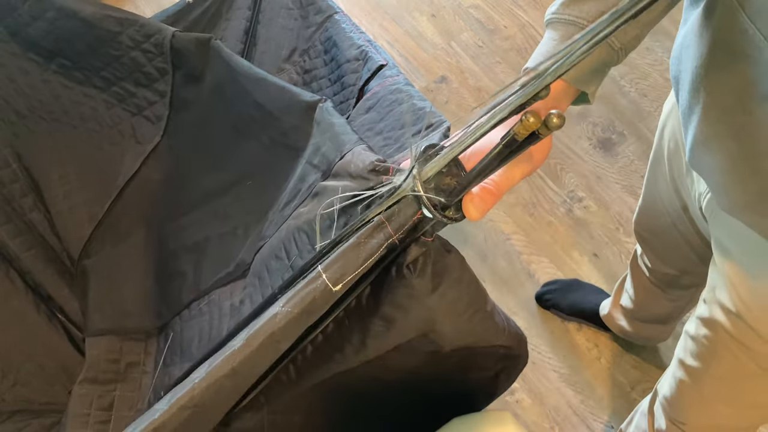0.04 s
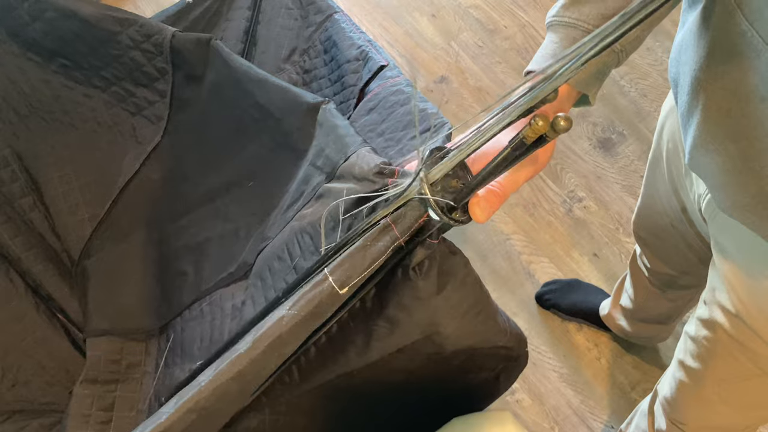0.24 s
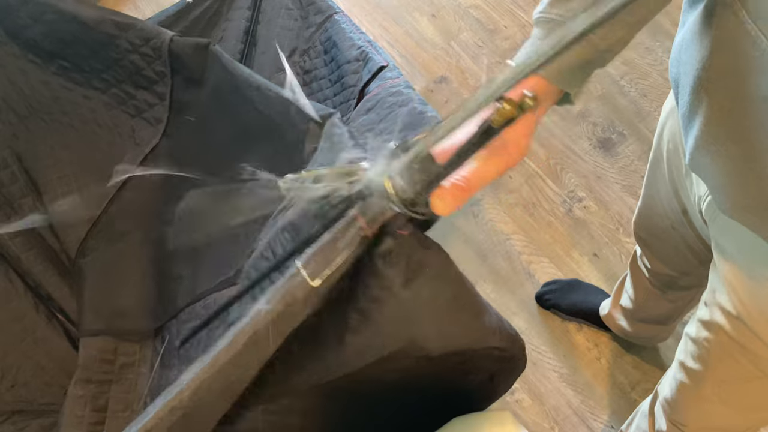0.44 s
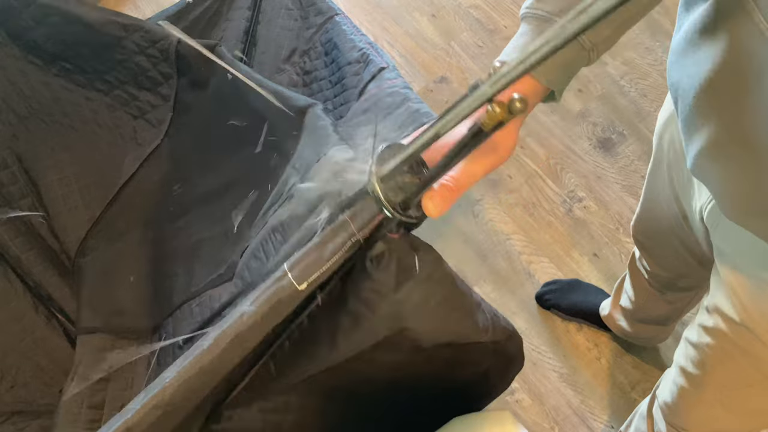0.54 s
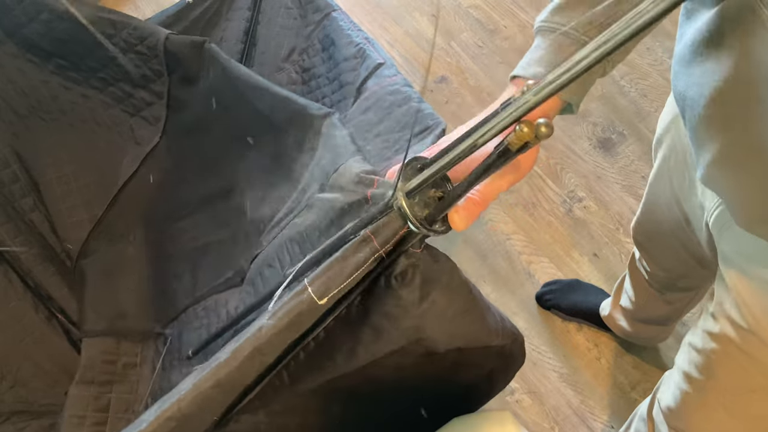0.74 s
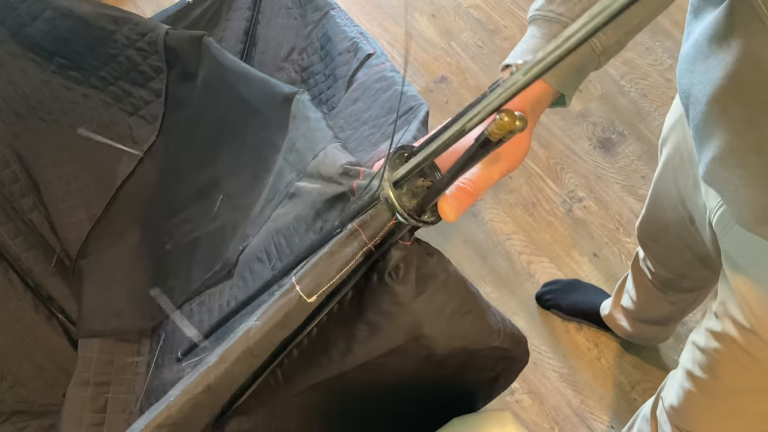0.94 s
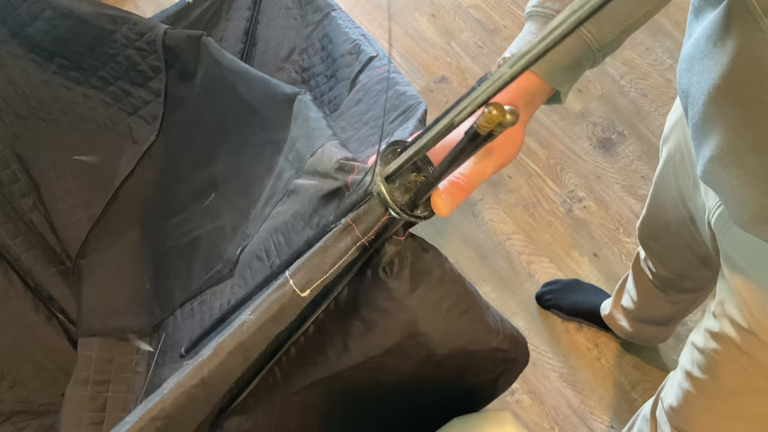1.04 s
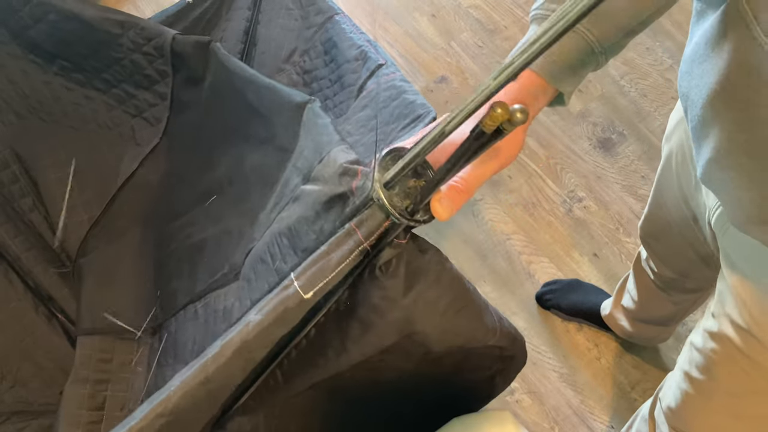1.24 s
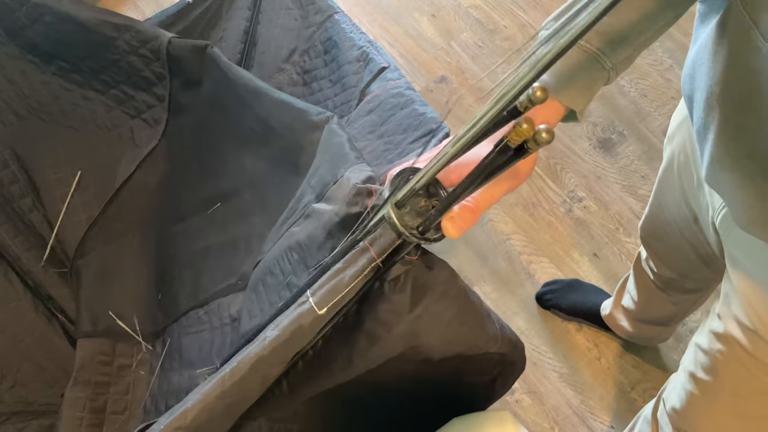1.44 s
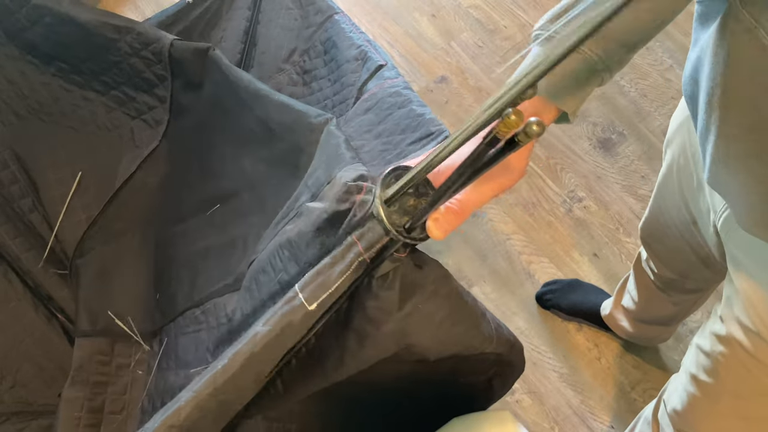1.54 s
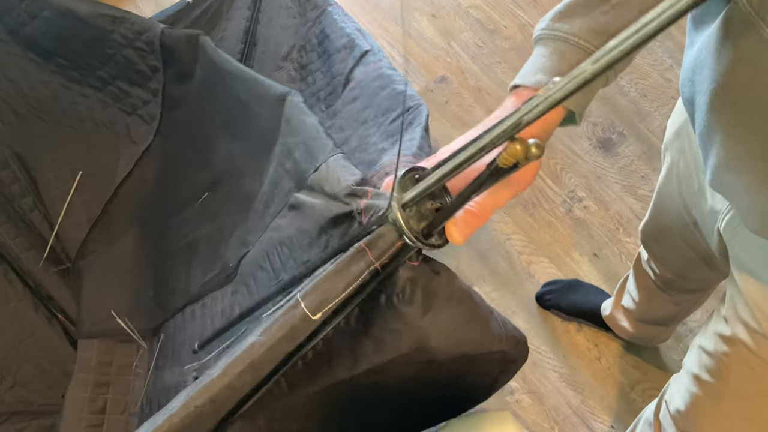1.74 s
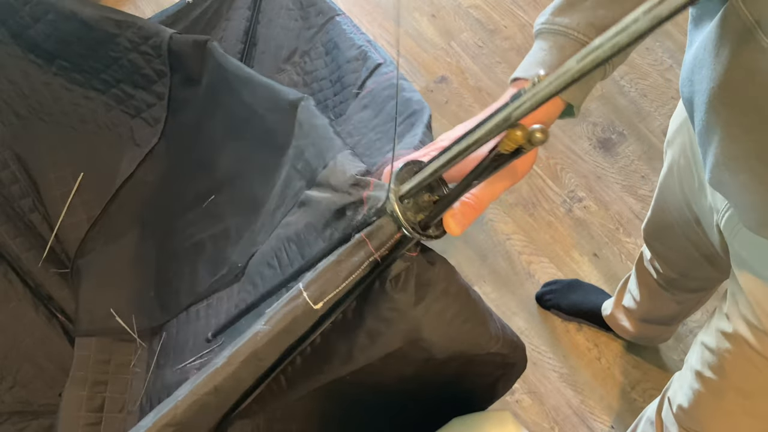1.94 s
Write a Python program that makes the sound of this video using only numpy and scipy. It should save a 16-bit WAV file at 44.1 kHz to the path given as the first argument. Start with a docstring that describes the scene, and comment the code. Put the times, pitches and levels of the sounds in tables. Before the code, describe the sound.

A splintered fiberglass rod is forced through a metal hub. After near quiet, bright fiber snaps and a dry rasp start at 0.2 seconds, peaking in a sharp crack near 0.39 with brief chatter and metallic ringing. A shorter, weaker scrape with snaps and dull pole knocks comes around 0.6. Soft cover rustling follows, then a crisp snap and rasp near 1.48, clicks at 1.56, and faint rustling in a small room.

```python
"""Splintered rod forced through a metal hub

A small room with a wooden floor, one microphone; the first echoes travel about 0.8 m further than
the direct sound. A broken fibreglass rod goes through the hub of a folding canopy frame in three pushes.
Random slips, filtered, make the rasp; noise bursts make the snaps and the sharp crack of the first push.
Poles knock as damped tones, and decaying sines ring for the loose fibres and the frame.
The cover rustles as filtered grains, and echoes of decaying noise and a low room tone lie around it all."""
import sys
import numpy as np
from scipy import signal
from scipy.fft import rfft, irfft
from scipy.io import wavfile
from scipy.ndimage import uniform_filter1d

SR = 44100
rng = np.random.default_rng(int(sys.argv[2]) if len(sys.argv) > 2 else 0)


def dump(signal):
    """Clip the signal to [-1, 1] and save it as 16-bit WAV at the path in sys.argv[1]."""
    limited = np.clip(np.atleast_2d(signal).T, -1, 1)
    pcm = np.round(limited * 32767).astype(np.int16)
    wavfile.write(sys.argv[1], SR, pcm)


N = 88200

# Spectra named *_COLOUR give relative shape: (frequency [Hz], level [dB])
# Steady sound of the place
ROOM_TONE_COLOUR = [(20, 13), (40, -1), (70, 3.5), (130, 3), (300, -10), (1000, -28), (3000, -30.5),
                    (16000, -54)]
ROOM_TONE_DB = -67
# Hands on the gear: (time [s], cover rustle level [dB], sliding hiss level [dB])
HANDLING_LEVELS = [(0, -66.5, -61.5), (.11, -71.5, -82), (.155, -64.5, -70), (.195, -70.5, -72.5),
                   (.5, -76, -71), (.57, -57.5, -71), (.72, -58, -72), (.78, -57.5, -71), (.82, -65, -71.5),
                   (.88, -57.5, -72), (.96, -70.5, -76.5), (1.02, -64.5, -74.5), (1.09, -58, -74.5),
                   (1.17, -61.5, -69), (1.23, -58, -71), (1.26, -55.5, -63.5), (1.32, -58, -57.5),
                   (1.39, -61.5, -65), (1.6, -58.5, -70), (1.72, -65, -75), (1.8, -62.5, -73.5),
                   (1.92, -57, -67.5), (2, -61.5, -71)]
# Rustling cover
COVER_COLOUR = [(40, -2), (80, 0), (140, 5), (300, 0), (500, -1.5), (700, 0.5), (1000, -3.5), (1700, -4),
                (2200, -12), (3200, -9.5), (5000, -18), (16000, -39)]
# Rod sliding lightly
SLIDE_COLOUR = [(300, -19), (1500, -5), (3000, -2), (5500, -3.5), (8500, 3.5), (11500, -1.5), (13500, -3.5),
                (16000, -3)]
RUSTLES_PER_S, RUSTLE_SPREAD_DB = 4000, 2.5
# Echoes by band: (frequency [Hz], time to fall 60 dB [s], echo level [dB])
ROOM_BANDS = [(100, 0.41, -12), (400, 0.41, -7.5), (1130, 0.33, -12), (3100, 0.42, -10), (8000, 0.42, -14),
              (16000, 0.26, -36)]
FIRST_ECHO_S, ECHO_BUILD_S = 0.0023, 0.0063
# Fibres snapping: (time [s], level as energy over 1 ms [dB], burst decay [ms], low-pass [Hz])
FIBRE_SNAPS = [(.0625, -66, 0.51, 14000), (0.08, -56.5, .6, 14000), (.1215, -55.5, 2, 14000),
               (0.2184, -41, 0.61, 16000), (0.2353, -27, 3.3, 14500), (0.2868, -32, 0.4, 11100),
               (.308, -29, 1.8, 13000), (.368, -50, 1, 14100), (.41, -58, 1.2, 8900),
               (.4165, -39, 1.7, 9000), (.5908, -40.5, 1.4, 7850), (.6103, -61, .8, 9000),
               (0.6173, -33, 1.3, 15200), (0.6524, -39, 2.1, 17000), (.6875, -60, .7, 16000),
               (.773, -59, .8, 10000), (1.2066, -52.5, 0.76, 9000), (1.414, -50.5, .7, 14000),
               (1.4776, -26.5, 0.27, 10200), (1.663, -49.5, 0.55, 17000), (1.7528, -54, 0.65, 11900),
               (1.8648, -53.5, 1.5, 14000), (1.956, -62, 0.54, 10000), (1.982, -56.5, 0.51, 14900)]
# Snapping fibre
SNAP_COLOUR = [(300, -9), (2000, -2.5), (4200, -16), (7500, 0), (11500, -1.5), (14000, -4.5), (16000, 1)]
# Rod cracking and catching on the rim: (time [s], level as energy over 1 ms [dB], burst decay [ms],
# low-pass [Hz])
ROD_CRACKS = [(.3829, -21.5, 0.24, 14000), (0.3893, -20, 0.3, 6860), (0.3905, -24.5, 3, 7900),
              (.599, -37.5, 0.92, 6000), (.855, -52.5, 5.7, 3400), (.885, -64, 2.5, 3000),
              (1.051, -73, 2.5, 3800), (1.089, -56.5, 1.6, 4000), (1.098, -50.5, 2, 4000),
              (1.2453, -47, 3.3, 3840), (.2385, -35, 10, 2580), (1.5475, -39, 1.2, 4200),
              (1.5616, -32, 1.9, 3470), (1.565, -39, 5.9, 3200), (1.829, -55, 1.7, 3500)]
# Cracking rod
CRACK_COLOUR = [(100, 0), (550, -7), (1000, 1), (2000, -5), (3100, 5), (4500, 0), (10000, 6), (16000, 11)]
# Loose fibres: pitch range [Hz], time to fall 60 dB [s], level [dB]
SPLINTER_HZ, SPLINTER_T60_S, SPLINTER_DB = (2525, 13180), 0.044, -9.5
# Modes of the frame: (frequency [Hz], level relative to RING_DB [dB], time to fall 60 dB [s])
FRAME_MODES = [(445, 1, 0.74), (686, -4, 0.9), (862, -0.5, 0.1), (940, -18.5, 1), (1052, 1.5, 0.17),
               (1125, 4.5, 0.26), (1400, -2, 0.9), (1417, -4.5, 0.75), (1513, -20, 0.18), (1644, 1.5, 0.13),
               (2810, -21, 0.079), (3255, -18, 0.088), (3210, -32, 0.46), (3430, 2, 0.57)]
RING_DB = -3
# Three pushes, one list each: (time [s], fibre rasp level [dB], rod body level [dB])
PUSH_LEVELS = [
    [(.214, -50.5, -60), (.236, -60, -55), (.256, -40, -45.5), (.283, -39.5, -39.5), (.304, -38, -44),
     (.311, -34.5, -42), (.335, -38, -40.5), (.364, -47, -50), (.376, -32, -34), (.392, -34.5, -28.5),
     (.42, -48.5, -62), (.48, -60.5, -50)],
    [(.583, -66, -62), (.596, -47.5, -52), (.616, -37.5, -45), (.634, -52, -50), (.66, -52, -52.5),
     (.71, -72, -64)],
    [(1.41, -69, -59.5), (1.445, -52, -57), (1.468, -47.5, -55), (1.481, -36.5, -40), (1.5, -38, -42.5),
     (1.516, -41, -43.5), (1.53, -51, -48.5), (1.57, -58, -52.5), (1.62, -89, -78)],
]
# Fibres rasping on the rim
RASP_COLOUR = [(300, -33), (1200, -8.5), (2200, -2.5), (3200, 0.5), (4500, -2.5), (7800, -2), (11500, -4.5),
               (13500, -11.5), (16000, -10)]
# Body of the shaken rod
BODY_COLOUR = [(30, -0.5), (60, 2), (150, -0.5), (300, -5), (550, -5.5), (850, -2.5), (1400, -2.5),
               (2000, -5), (3200, -6), (5000, -15), (12000, -41)]
GRAINS_PER_S, GRAIN_SPREAD_DB = 7000, 2
JUDDER_SMOOTHING_MS, JUDDER_RMS_DB = 4.48, 2.0
# Poles knocking together: (time [s], level as energy over 1 ms [dB], pitch [Hz], decay [ms])
POLE_KNOCKS = [(.386, -17.5, 1090, 0.55), (0.291, -36, 190, 20), (.305, -40, 233, 15),
               (0.385, -31, 137.5, 8.5), (0.6306, -33, 533, 4.3), (.655, -34.5, 241.3, 20),
               (.663, -35.5, 147.7, 20), (0.734, -45, 155, 22), (.765, -48.5, 407, 20),
               (.843, -39.5, 457, 6.4), (1.235, -44, 67, 16), (1.256, -41.5, 240, 28),
               (1.569, -37, 950, 0.67), (1.487, -41, 388, 3.3), (1.635, -48, 200, 9.2),
               (1.964, -46, 158, 17)]
KNOCK_RISE_MS, KNOCK_RATTLE_RMS = .15, 0.41  # rattle against a sine of amplitude 1
# Chatter of the freed rod: (time [s], level [dB])
SHUDDER_LEVELS = [(.393, -55), (.41, -50), (.44, -40), (.46, -50.5), (.49, -58), (.55, -72)]
# Chattering rod
SHUDDER_COLOUR = [(300, -28.5), (600, -6), (750, -6), (950, 2), (1150, -4), (1400, -8), (1650, -5),
                  (2100, -14), (6000, -46)]
SHUDDERS_PER_S, SHUDDER_SPREAD_DB = 1100, 2.5
TOP_HZ = 15800  # upper limit of the recorder


def undb(db):
    """Decibels to amplitude."""
    return 10 ** (np.asarray(db) / 20)


def unit(x):
    """Scale to an RMS of 1."""
    return x / np.sqrt(np.mean(x ** 2))


def curve(rows, axis):
    """Gain from one dB column of a timed table, silent outside it."""
    rows = np.array(rows)
    db = np.interp(np.arange(N) / SR, rows[:, 0], rows[:, axis], left=-200, right=-200)
    return undb(db)


def on_log(hz, rows, axis=1):
    """One column of a table, read along log frequency."""
    rows = np.array(rows)
    return np.interp(np.log(hz + 1), np.log(rows[:, 0]), rows[:, axis])


def colour(x, spectrum):
    """Causal, minimum-phase filter with the given spectrum, by folding its cepstrum."""
    n = 2 * len(x)
    hz = np.arange(n // 2 + 1) * SR / n
    cepstrum = irfft(np.log(undb(on_log(hz, spectrum))))
    cepstrum[1:n // 2] *= 2
    cepstrum[n // 2 + 1:] = 0
    response = np.exp(rfft(cepstrum))
    return irfft(rfft(x, n) * response)[:len(x)]


def dull(x, hz, order=3):
    """Low-pass that takes away the treble."""
    sos = signal.butter(order, min(hz, .45 * SR), fs=SR, output="sos")
    return signal.sosfilt(sos, x)


def add(track, start, sound, db):
    """Lay in a short sound with the energy of 1 ms at the given level."""
    i = int(max(start, 0) * SR)
    sound = sound * undb(db) * np.sqrt(SR / 1000 / np.sum(sound ** 2))
    track[i:i + len(sound)] += sound[:max(N - i, 0)]


def grains(per_s, spread_db):
    """Random tiny slips of either sign, most weak and a few strong."""
    chance = rng.random(N)
    size = np.minimum(rng.exponential(size=N), 5)
    return (chance < per_s / SR) * rng.choice([-1, 1], N) * undb(spread_db * size)


def room_tone():
    """Steady noise of the place, weighted to the bass."""
    return undb(ROOM_TONE_DB) * unit(colour(rng.standard_normal(N), ROOM_TONE_COLOUR))


def handling():
    """The cover rustles and the rod slides lightly, as two streams of tiny slips."""
    rustle = unit(colour(grains(RUSTLES_PER_S, RUSTLE_SPREAD_DB), COVER_COLOUR))
    slide = unit(colour(grains(GRAINS_PER_S, RUSTLE_SPREAD_DB), SLIDE_COLOUR))
    return rustle * curve(HANDLING_LEVELS, axis=1) + slide * curve(HANDLING_LEVELS, axis=2)


def room(x):
    """Diffuse echoes: noise in blended bands that build up together, each dying at its own rate."""
    t = np.arange(N // 2) / SR
    noise = rfft(rng.standard_normal(len(t)))
    hz = np.arange(len(t) // 2 + 1) * SR / len(t)
    onset = 1 - np.exp(-np.maximum(t - FIRST_ECHO_S, 0) / ECHO_BUILD_S)
    centres = np.log(np.array(ROOM_BANDS)[:, 0])
    response = 0
    for (_, t60, db), own in zip(ROOM_BANDS, np.eye(len(ROOM_BANDS))):
        band = np.interp(np.log(hz + 1), centres, own)  # 1 at its own centre, 0 at the others
        shape = onset * np.exp(-np.log(1000) * t / t60)
        shape = shape / np.sqrt(np.sum(shape ** 2))
        response = response + irfft(noise * band, len(t)) * shape * undb(db)
    return signal.fftconvolve(x, response)[:N]


def burst(decay_ms, size=2048):
    """One fracture: a spike and a quickly dying crackle."""
    ms = np.arange(size) / SR * 1000
    x = rng.standard_normal(size) * np.exp(-ms / decay_ms)
    x[0] = 4.9
    return x


def fractures():
    """Bright snaps of single fibres and fuller cracks of the rod."""
    out = np.zeros(N)
    for table, spectrum in (FIBRE_SNAPS, SNAP_COLOUR), (ROD_CRACKS, CRACK_COLOUR):
        for start, db, decay_ms, hz in table:
            fracture = colour(burst(decay_ms), spectrum)
            add(out, start, dull(fracture, hz), db)
    return out


def splinters(x, count=64):
    """Loose fibres of many lengths ring briefly as they are plucked."""
    t = np.arange(N // 16) / SR
    hz = np.geomspace(*SPLINTER_HZ, count) * (1 + 0.0312 * rng.standard_normal(count))
    cycles = hz[:, None] * t + rng.random((count, 1))
    rate = np.log(1000) / SPLINTER_T60_S
    ring = np.sin(2 * np.pi * cycles).sum(0) * 2 * rate / SR * np.exp(-rate * t)
    return undb(SPLINTER_DB) * signal.fftconvolve(x, ring)[:N]


def frame(x):
    """The frame's modes, decaying sines, ring with every contact."""
    t = np.arange(N // 3) / SR
    ring = 0
    for hz, db, t60 in FRAME_MODES:
        rate = np.log(1000) / t60
        gain = undb(db + RING_DB) * 2 * rate / SR  # sets the level at resonance
        ring = ring + gain * np.exp(-rate * t) * np.sin(2 * np.pi * hz * t)
    return signal.fftconvolve(x, ring)[:N]


def scrapes():
    """Fibres catch on the rim in slips of juddering strength and shake the rod."""
    wander = uniform_filter1d(rng.standard_normal(N), int(SR * JUDDER_SMOOTHING_MS / 1000))
    slips = grains(GRAINS_PER_S, GRAIN_SPREAD_DB) * undb(JUDDER_RMS_DB * unit(wander))
    rasp = unit(colour(slips, RASP_COLOUR)) * sum(curve(p, axis=1) for p in PUSH_LEVELS)
    body = unit(colour(slips, BODY_COLOUR)) * sum(curve(p, axis=2) for p in PUSH_LEVELS)
    return rasp + body


def knocks(size=8192):
    """Poles knock under the cover: damped sines with a rattle of noise around each pitch."""
    out = np.zeros(N)
    t = np.arange(size) / SR
    ms = t * 1000
    for start, db, hz, decay_ms in POLE_KNOCKS:
        noise = dull(rng.standard_normal(size), hz / 2)
        rattle = unit(noise * np.cos(2 * np.pi * hz * t))
        tone = np.sin(2 * np.pi * hz * t)
        shape = (1 - np.exp(-ms / KNOCK_RISE_MS)) ** 2 * np.exp(-ms / decay_ms)
        add(out, start, shape * (tone + KNOCK_RATTLE_RMS * rattle), db)
    return out


def shudder():
    """The freed rod chatters in the hub just after the crack, as sparser slips."""
    chatter = colour(grains(SHUDDERS_PER_S, SHUDDER_SPREAD_DB), SHUDDER_COLOUR)
    return unit(chatter) * curve(SHUDDER_LEVELS, axis=1)


def scene():
    """All contacts, the ringing fibres and frame, the handling and the room, in one channel."""
    contacts = scrapes() + fractures() + knocks() + shudder()
    direct = contacts + splinters(contacts) + frame(contacts) + handling()
    tone = room_tone()
    return (direct + room(direct) + tone)[None]


def record(dry):
    """The recorder cuts the top with a steep low-pass."""
    sos = signal.ellip(10, .2, 70, TOP_HZ, fs=SR, output="sos")  # 0.2 dB ripple, 70 dB rejection
    return signal.sosfilt(sos, dry)


dry = scene()
out = record(dry)
dump(out)
```